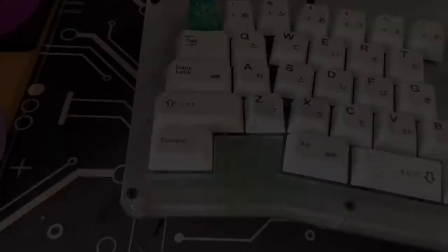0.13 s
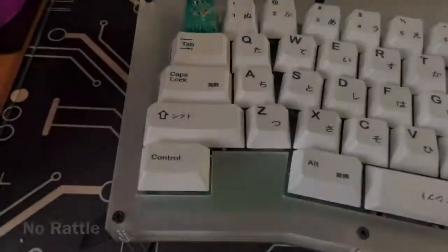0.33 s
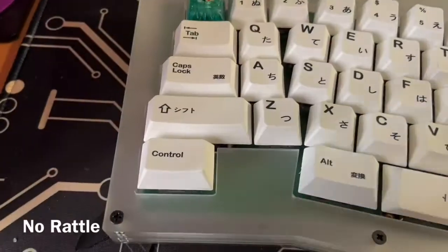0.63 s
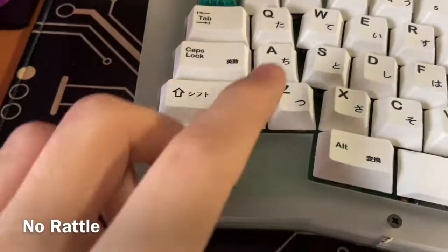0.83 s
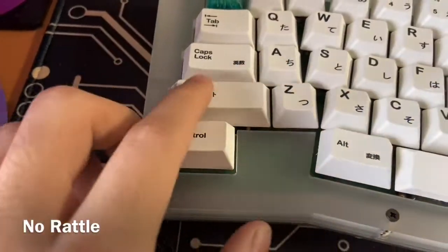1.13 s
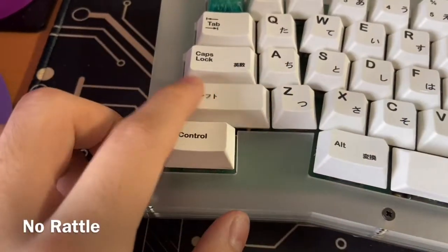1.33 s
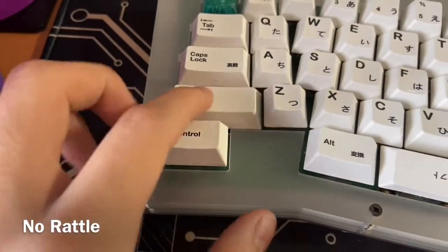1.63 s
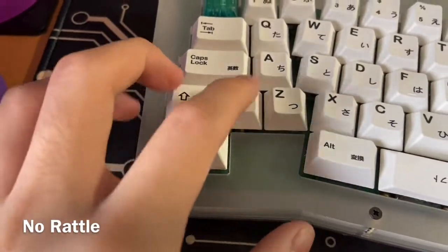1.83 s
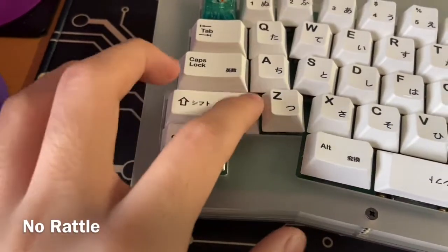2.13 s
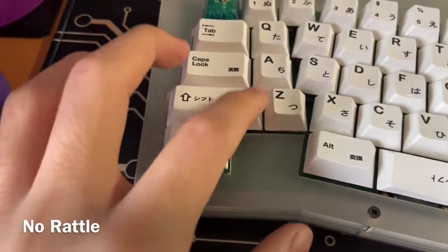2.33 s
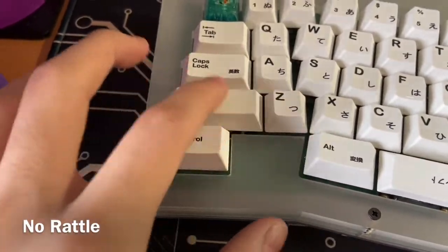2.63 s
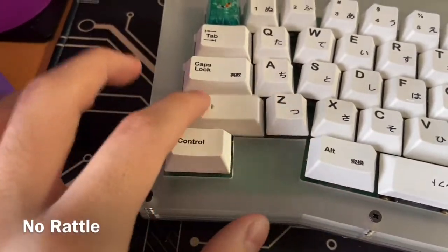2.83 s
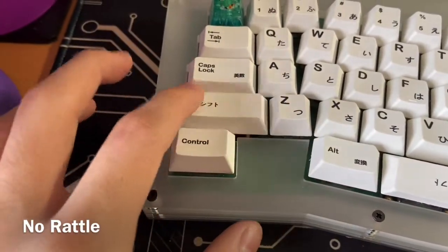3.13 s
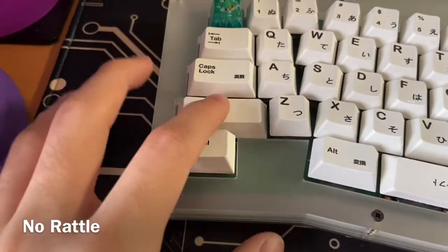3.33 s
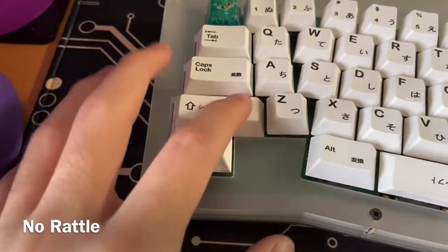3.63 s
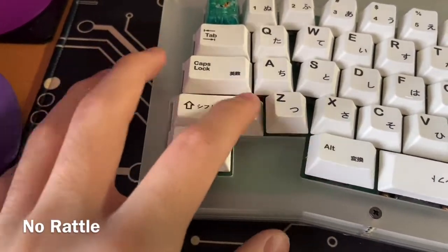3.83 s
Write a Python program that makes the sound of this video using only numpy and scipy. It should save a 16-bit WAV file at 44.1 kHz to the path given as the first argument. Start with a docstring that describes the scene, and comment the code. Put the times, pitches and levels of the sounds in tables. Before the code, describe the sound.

A mechanical keyboard key is worked by a finger, heard close in stereo in a quiet room. Soft hiss and low humming rumble fade in over the first second, with tiny touches near 0.8 and faint skin rubs from 1.0. From 1.4 to the end near 4 seconds, sharp hard-plastic clacks, about six presses a second, alternate with clicky releases, slightly uneven, with brief room reflections.

```python
"""At a desk in a quiet room, a phone lies close to a mechanical keyboard while a finger works one long key.
Each landing, release and touch rings the damped modes of key and case, with a short noise crack and a rebound;
a wall and the dying noise of the room answer. Soft shaped noise makes the sliding of finger and stem.
Noise hiss, noise rumble and drifting sine hum fade in underneath."""
import sys
import numpy as np
from scipy import signal
from scipy.fft import rfft, irfft, next_fast_len
from scipy.io import wavfile
from scipy.ndimage import uniform_filter1d, map_coordinates

SR = 44100
rng = np.random.default_rng(int(sys.argv[2]) if len(sys.argv) > 2 else 0)


def level_to_linear(level):
    """Convert decibel levels to linear amplitude factors, elementwise."""
    exponent = np.asarray(level, float) / 20
    return 10 ** exponent


def to_wav(s):
    """Save 16-bit WAV."""
    ch = np.atleast_2d(s).T  # columns
    pcm = np.round(np.clip(ch, -1, 1) * 32767)  # PCM
    wavfile.write(sys.argv[1], SR, pcm.astype(np.int16))


N = 176400

# modes of key and case: pitch_hz, press_db, release_db, touch_db, t60_s, left_over_right_db, left_leads_rad
KEY_MODES = [(638, 13.5, 13, 1.5, 0.019, -2.5, 0.55), (876, 5, -4, -1, 0.018, -2, 1),
             (1053.4, 12, -5.5, -4.5, 0.014, -13.5, 0.16), (1464, 10, -3.5, 0, 0.012, -5, 0.5),
             (1768, -1.5, -12, -7, 0.022, -14, -1.5), (2252, -3.5, -25, -7, 0.014, -4, 1.32),
             (2453, -11.5, -8.5, -9.5, 0.021, -4, 1.5), (3330, -8, -13.5, -7.5, 0.018, 0, 0.25),
             (3924, -1.5, -1.5, 1.5, 0.011, -2, 2), (4535, -6, -9, -11.5, 0.019, -2.5, 1.75),
             (5216, 0.5, 17.5, -2.5, 0.013, 0.5, 1.22), (6080, -7.5, -2.5, 3, 0.0082, -3.5, 1.96),
             (6940, 1, -8, 2, 0.0069, 5.5, 3.5), (9340, 12, -1.5, -4, 0.0057, -0.5, 1.68),
             (10500, 13, -4, 1, 0.0036, -1, 1.8), (11450, 12, -10.5, -1.5, 0.0058, -1, 1.95),
             (13070, 11, -9, -10, 0.0057, -2, 4.5), (14960, 5, -10, -8, 0.009, 1, -2.5)]


def unit(x):
    """Scales to rms 1."""
    return x / np.sqrt(np.mean(x ** 2) + 1e-20)


def along(points, hz):
    """Reads a curve of (Hz, value) points on a log frequency axis."""
    f, v = np.transpose(points)
    return np.interp(np.log(hz + 1), np.log(f + 1), v)


def wobble(rate):
    """A smooth random curve, rate knots a second."""
    knots = rng.standard_normal(int(N * rate / SR) + 4)
    return map_coordinates(knots, [np.arange(N) * rate / SR])


def filtered(x, response):
    """Multiplies the spectrum of x by a complex response of frequency."""
    n = x.shape[-1]
    m = next_fast_len(n + 2048, True)
    return irfft(rfft(x, m) * response(np.fft.rfftfreq(m, 1 / SR)), m)[..., :n]


def rush(spectrum, alike, lead, patchy_db):
    """Stereo noise of rms 1: patches of random gain, then colour, left-right likeness and phase by frequency."""
    z = signal.stft(rng.standard_normal((2, N)), nperseg=512)[2]
    field = uniform_filter1d(rng.standard_normal(z.shape[1:]), size=6, axis=0)
    field = uniform_filter1d(field, size=10, axis=1)
    pair = signal.istft(z * level_to_linear(patchy_db * unit(field)), nperseg=512)[1][:, :N]

    def mid_and_side(hz):
        turn = np.arccos(np.clip(along(alike, hz), -1, 1)) / 2
        return level_to_linear(along(spectrum, hz)) * [np.cos(turn), np.sin(turn)]

    mid, side = filtered(pair, mid_and_side)
    left_right = np.array([mid + side, mid - side])
    return unit(filtered(left_right, lambda hz: np.exp(.5j * along(lead, hz) * [[1], [-1]])))


def key():
    """Presses, releases and fingertip touches weight the same modes differently."""
    # key bottoms out: start_s, click_db, then over the click: case_thud_db, right_end_ring_db,
    # left_end_ring_db, plate_ring_db, treble_snap_db
    presses = [(1.3889, -30, -8.5, -11, -4, -5.5, -16.5), (1.5731, -28.5, -10, -14, -5.5, -6.5, -13),
               (1.7358, -41, -6.5, 2, -9, -4, -32), (1.9218, -29, -6, -3, -6.5, 7, -25),
               (2.101, -28, -10, -4, -18, -3.5, -23), (2.247, -33.5, -14, -4.5, -18, -2, -19),
               (2.397, -25.5, -6.5, -6, -8, 4.5, -15.5), (2.5623, -22, -9.5, -6.5, -9.5, 0.5, -20),
               (2.7194, -24.5, -7.5, -12.5, -1.5, 0.5, -19.5), (2.8783, -27, -8.5, -12.5, -2, -1.5, -15),
               (3.0353, -30.5, -9.5, -8.5, -4.5, -4, -15), (3.1913, -33, -6, -10.5, -4, -2, -15.5),
               (3.3526, -24, -6.5, -16, -4.5, -6, -16), (3.5185, -27, -6, -5, -8.5, 4, -20),
               (3.6703, -24, -6, -10, -6, 0, -13.5), (3.8452, -26, -7, -5, -9.5, 2.5, -47)]
    # key springs back against its stop: start_s, click_db, then over the click: case_thud_db, stem_ring_db
    releases = [(1.4917, -26.5, -12.5, -24), (1.8435, -24.5, -9, -16.5), (2.0187, -28.5, -14, -18.5),
                (2.1925, -31, -10.5, -18.5), (2.3157, -25, -9, -15), (2.5103, -32.5, -9.5, -18),
                (2.653, -26, -8.5, -14.5), (2.8215, -38, -6, -22), (2.9726, -30, -9, -25),
                (3.1267, -28, -11, -26), (3.4493, -28.5, -10.5, -16.5), (3.6053, -25, -9, -12),
                (3.7612, -25.5, -10.5, -12.5)]
    # fingertip lands on the cap: start_s, click_db, low_knock_db over the click
    touches = [(0.794, -40, 3), (0.808, -40, -4), (.8934, -52.5, 11), (1.558, -47, 2), (1.9032, -35, -6),
               (2.3753, -42, -10), (3.169, -51, 6), (3.8295, -35.5, -5)]
    _, press, release, touch, *_ = np.transpose(KEY_MODES)
    one = np.eye(len(KEY_MODES))
    thud, right, left, plate, stem = one[0], one[2], one[3] + one[4], one[5:8].sum(axis=0), one[10]
    knock, snap = np.arange(len(KEY_MODES)) < 5, np.arange(len(KEY_MODES)) > 12
    rows = [(s, db, press + a * thud + b * right + c * left + d * plate + e * snap)
            for s, db, a, b, c, d, e in presses]
    rows += [(s, db, release + a * thud + b * stem) for s, db, a, b in releases]
    rows += [(s, db, touch + a * knock) for s, db, a in touches]
    times, click_db, mode_db = map(np.array, zip(*rows))
    out = np.zeros((2, N + SR))
    for s, blow in zip(times, blows(click_db, mode_db)):
        out[:, round(s * SR):][:, :blow.shape[1]] += blow
    return out[:, :N]


def blows(click_db, mode_db):
    """Each contact rings every mode, high ones first, with a short crack and a rebound; the room answers."""
    crack_tone = [(1500, -17), (2500, 2), (5500, -6), (7300, -5.5), (9500, -6.5), (12000, -22),
                  (13500, -6.5), (15300, -19), (16500, -33)]  # colour of the crack: pitch_hz, level_db
    crack_db, crack_t60_s = -8, 0.014
    crack_lead_s = 0.0001  # the crack comes first on the left
    rise_cycles = 1.52  # each mode builds up
    scatter_db, detune, slip_rad = 1.2, .008, .3  # random level, relative pitch and phase of each mode
    contact_s, lowest_hz = 0.001, 554  # the contact swells in; the small case radiates little lower
    rebound_s, rebound_db = 0.001989, -10.5  # the second end of the cap lands just after
    far_t60_s = 0.011  # from afar the blow sounds shorter and broader

    # axes: left-right, blow, mode, time
    hz, _, _, _, t60, pan_db, lead = np.transpose(KEY_MODES)[:, :, None]
    t, side = np.arange(SR // 40) / SR, np.array([.5, -.5])[:, None, None, None]
    tune, size, phase, land = np.moveaxis(rng.standard_normal(mode_db.shape + (4,)), -1, 0)[..., None]
    hz = hz * (1 + detune * tune)
    decay = level_to_linear(mode_db[..., None] + scatter_db * size - 60 * t / t60)
    rise = np.sin(np.pi / 2 * np.clip(t * hz / rise_cycles, 0, 1)) ** 2
    tones = np.sin(2 * np.pi * hz * t + slip_rad * phase + side * lead)
    ring = (decay * rise * level_to_linear(side * pan_db) * tones).sum(axis=2).swapaxes(0, 1)

    def crack_response(f):
        return level_to_linear(along(crack_tone, f)) * np.exp(2j * np.pi * f * crack_lead_s * side[:, 0, 0])

    grit = unit(filtered(rng.standard_normal(ring[:, :1].shape), crack_response))
    crack = level_to_linear(crack_db - 60 * t / crack_t60_s) * grit
    x = (ring + crack) * np.clip(t / contact_s, 0, 1) ** 2
    case = signal.butter(6, lowest_hz, 'high', fs=SR, output='sos')
    second_s = rebound_s * (1 + 0.064 * land[:, :1])  # varies from blow to blow
    x = filtered(signal.sosfilt(case, x), lambda f: 1 + level_to_linear(rebound_db) * np.exp(-2j * np.pi * f * second_s))
    out = signal.fftconvolve(x * level_to_linear(-60 * t / far_t60_s), tails(count=len(click_db)), axes=2)
    out[..., :len(t)] += x
    return level_to_linear(click_db)[:, None, None] * out


def tails(count):
    """Room answers, one for each blow: two wall echoes, and noise dying by band."""
    room_bands = [(497, 0.066, 4.5), (1110, 0.17, 2.5), (1580, 0.73, -12), (2830, 0.3, -0.5),
                  (4840, 0.34, -12), (10400, 0.69, -18), (15300, 0.12, -12.5)]  # the dying noise: pitch_hz, t60_s, level_db
    wall_s, wall_db, wall_top_hz, room_db = .0113, -10.5, 6540, -5.5
    f, t60, db = np.transpose(room_bands)
    hz, t, z = signal.stft(rng.standard_normal((count, 2, SR // 5)), SR, nperseg=256)
    gain = level_to_linear(along(np.c_[f, db], hz)[:, None] - 60 * t / along(np.c_[f, t60], hz)[:, None])
    tail = signal.istft(z * gain, SR, nperseg=256)[1]
    tail = level_to_linear(room_db) * tail / np.linalg.norm(tail, axis=-1).mean()
    echoes = np.isin(np.arange(tail.shape[-1]), [20, 130]) * level_to_linear(wall_db)  # samples after wall_s
    tail = tail + filtered(echoes, lambda f: 1 / (1 + (f / wall_top_hz) ** 4))
    return np.pad(tail, ((0, 0), (0, 0), (round(wall_s * SR), 0)))


def slide():
    """Skin and stem rub softly in short strokes; the grainy hiss takes the colour of the cap."""
    # finger or stem rubs, and a duller scrape of skin: start_s, length_s, level_db before the grain
    slides = [(.81, 0.077, -76), (1.004, 0.085, -72), (1.101, 0.063, -73), (1.254, 0.025, -71),
              (1.36, 0.043, -65.5), (1.664, 0.09, -63), (1.746, 0.12, -75), (2.618, 0.032, -57),
              (2.887, 0.047, -61), (3.085, 0.039, -64), (3.244, 0.055, -66.5), (3.862, 0.065, -65.5),
              (3.975, 0.049, -62.5)]
    scrapes = [(1.035, 0.046, -59.5)]
    # their colours: pitch_hz, level_db
    slide_tone = [(1200, -15), (1700, -13), (3000, -6), (4800, -4), (5250, 9.5), (6200, -1), (7300, -35),
                  (8500, -1.5), (9500, 0), (12000, -5.5), (13500, -15), (15200, -3), (16500, -40)]
    scrape_tone = [(1500, -14), (1800, 10), (2150, -40)]
    edge_s = 0.025  # ramp centred on each end of a stroke
    t = np.arange(N) / SR

    def strokes(rows):
        return sum(level_to_linear(db) * np.clip(np.minimum(t - s, s + length - t) / edge_s + .5, 0, 1)
                   for s, length, db in rows)

    def rub(tone):
        return rush(tone, [(5000, 0.85)], [(5000, 1.5)], patchy_db=1.0)

    grain = level_to_linear(2.0 * wobble(30.02) + 2.2 * wobble(250))
    return grain * (strokes(slides) * rub(slide_tone) + strokes(scrapes) * rub(scrape_tone))


def room():
    """Patchy noise hiss, near-mono noise rumble and wavering sine hum share one fade-in."""
    # noise colours: pitch_hz, level_db per Hz
    air = [(190, -17), (250, -5.5), (400, -7), (672, -9.5), (961, -9), (1560, -15.5), (3000, -27),
           (5250, -39.5), (7250, -45), (8670, -40.5), (11100, -45), (13500, -41), (15100, -50),
           (16500, -68)]
    low_air = [(20, -35), (32, -13), (42, -11.5), (60, 1.5), (108, -1.5), (156, -2.5), (222, -8.5),
               (260, -18.5), (340, -68)]
    # left-right likeness of hiss and rumble: pitch_hz, likeness (1 is mono)
    air_alike = [(180, 0.93), (550, 0.77), (1650, 0.041), (4970, 0.24), (15000, -0.33)]
    bass_alike = [(100, .997)]
    air_turn = [(0, 1), (1810, 0), (2500, -3.5), (4130, 5), (5000, -6), (5860, -21.5), (8180, -1),
                (9820, 10), (13000, 10), (16300, 6)]  # phase of the hiss: pitch_hz, left_leads_rad
    hum_tones = [(55, -1.5, 1.24), (77, -1.5, 1.7), (100.1, -4.5, 1.9), (118.2, -6, 1.9),
                 (158.1, -0.5, 0.36), (194.6, -7, 1.15), (234.2, -16, 1.2), (300, -14, 3.07)]  # pitch_hz, level_db (peak over hiss rms), waver_hz
    fade_from_s, fade_s, fade_bend, hiss_db = 0.037, 1.02, 1.07, -53.5
    hiss = rush(air, air_alike, air_turn, patchy_db=1.76)
    # the rumble wavers about the level of the hiss
    rumble = level_to_linear(2.5 * wobble(2.95)) * rush(low_air, bass_alike, [(100, 0)], patchy_db=0.0)
    hum = sum(level_to_linear(db + 2.05 * wobble(7.16)) * np.sin(2 * np.pi * np.cumsum(hz + waver * wobble(9)) / SR)
              for hz, db, waver in hum_tones)
    fade = np.clip((np.arange(N) / SR - fade_from_s) / fade_s, 0, 1) ** fade_bend
    return level_to_linear(hiss_db) * fade * (hiss + rumble + hum)


def scene():
    """Key, sliding hiss and room."""
    return key() + slide() + room()


def low_pass(x):
    """Removes everything above the highest recorded frequency."""
    return signal.sosfilt(signal.butter(12, 16750, fs=SR, output="sos"), x)


def record(dry):
    """The treble of the whole mix dips near 7 and 14 kHz and is cut steeply above 16.6 kHz."""
    treble_response = [(6500, -0.72), (7100, -17), (8000, -10), (8600, -3), (12600, 0.4), (13200, -8),
                       (14000, -19), (14600, -3.5), (16600, 9), (16760, -60)]  # treble response of the whole mix: pitch_hz, level_db
    mix = filtered(dry, lambda hz: level_to_linear(along(treble_response, hz)))
    return low_pass(mix)


dry = scene()
out = record(dry)
to_wav(out)
```